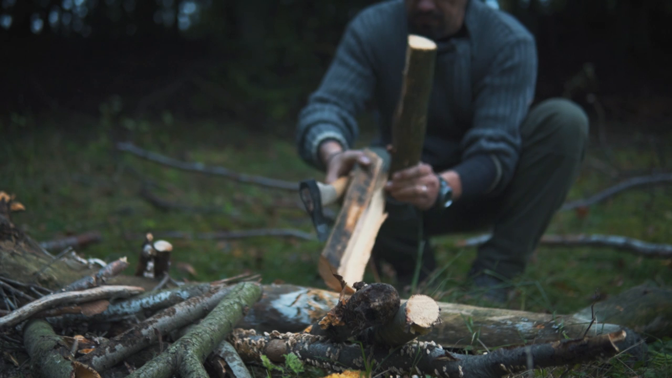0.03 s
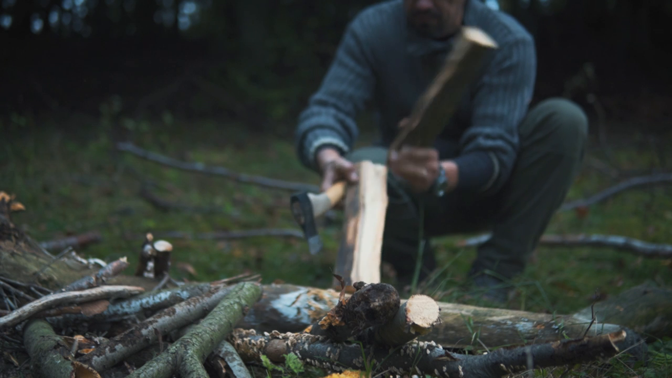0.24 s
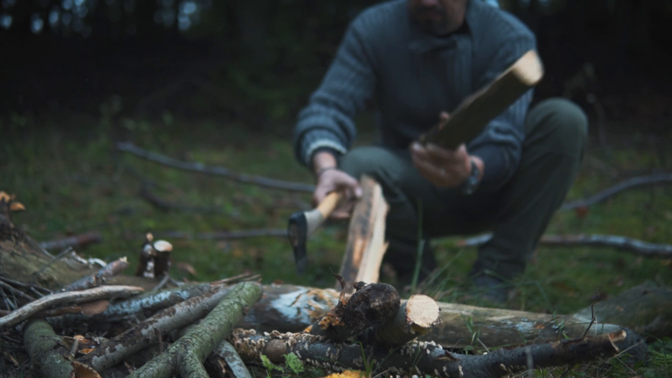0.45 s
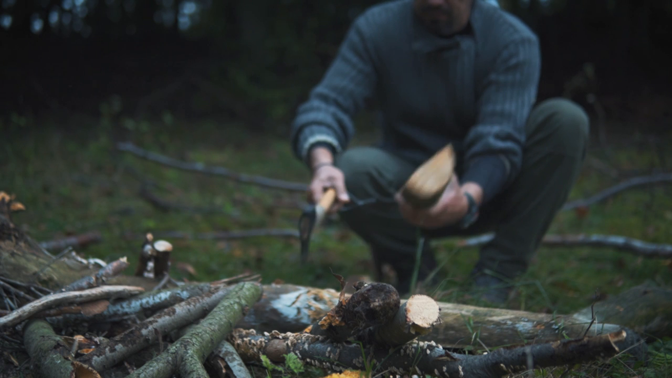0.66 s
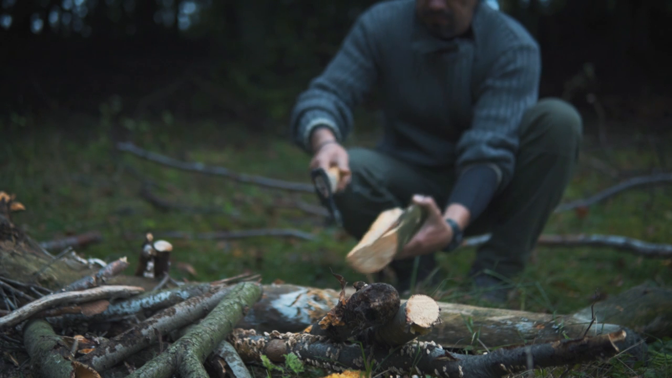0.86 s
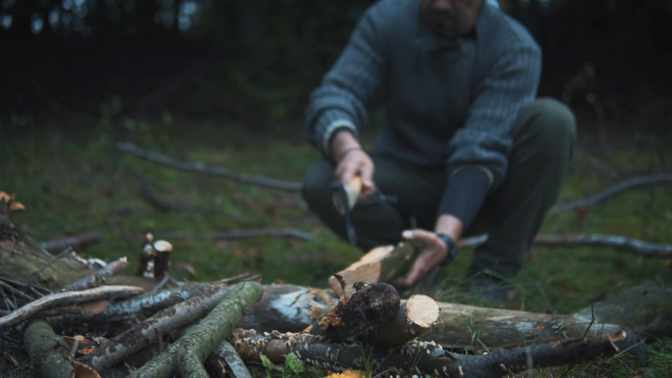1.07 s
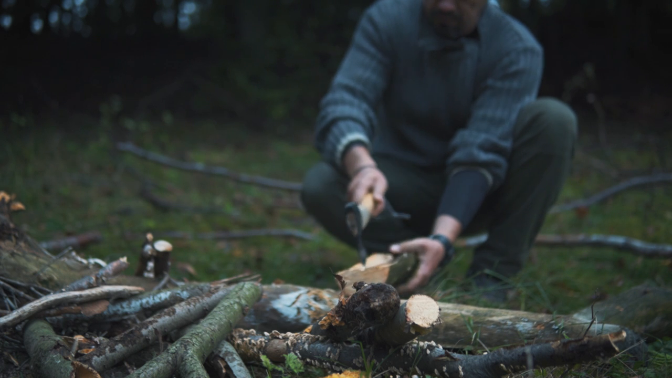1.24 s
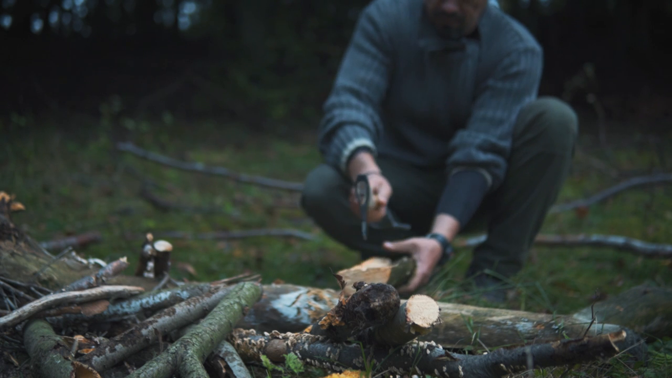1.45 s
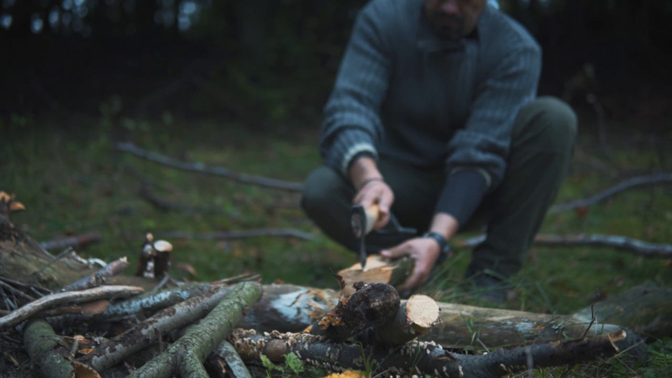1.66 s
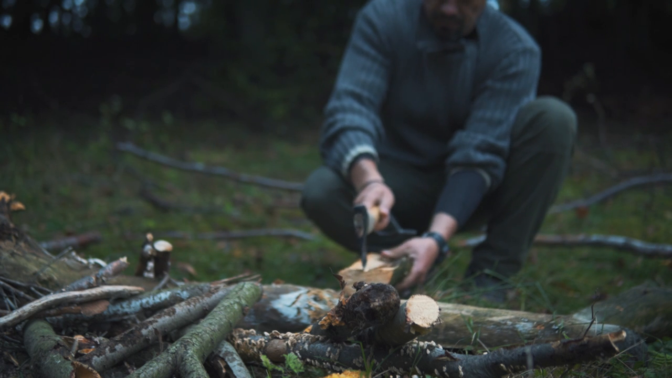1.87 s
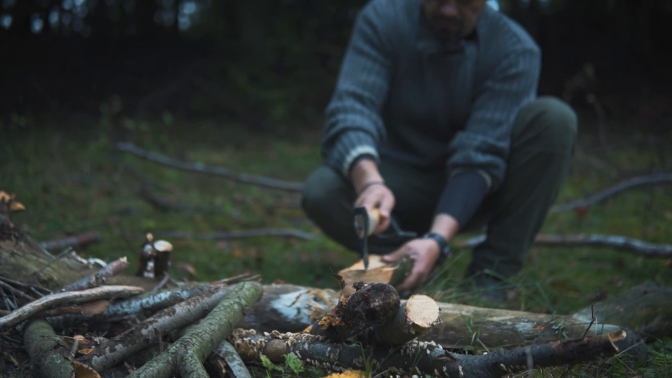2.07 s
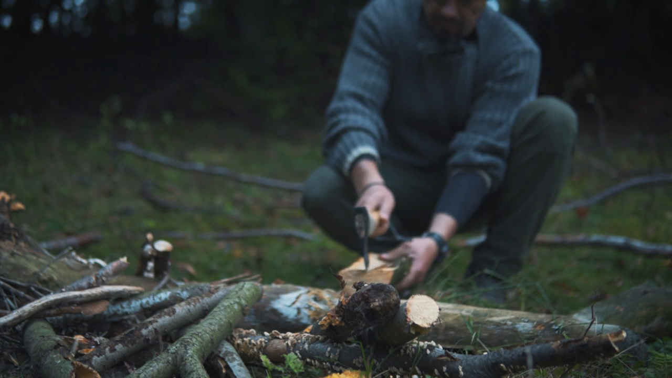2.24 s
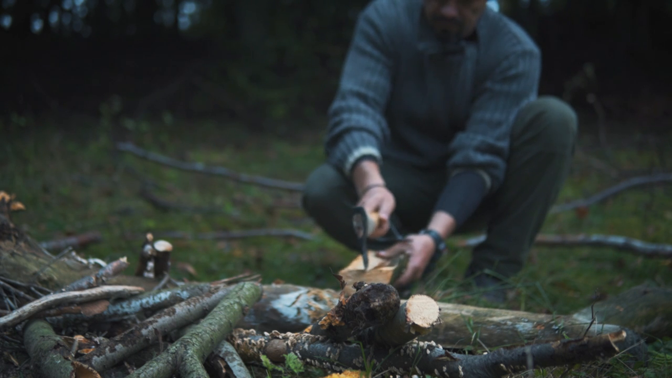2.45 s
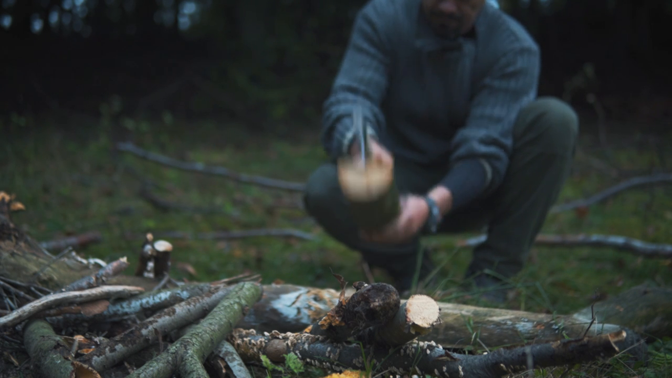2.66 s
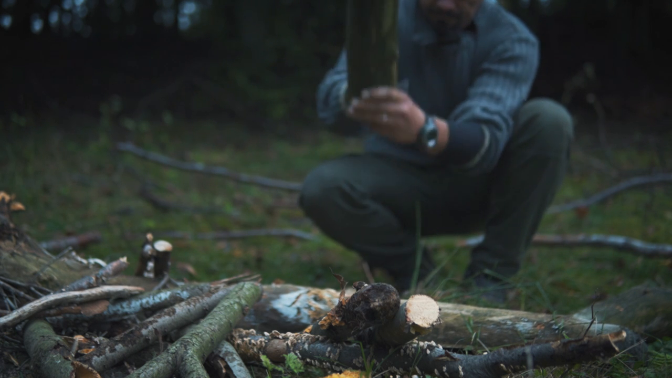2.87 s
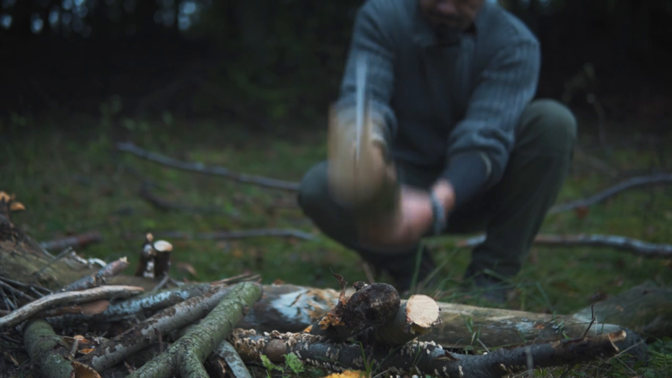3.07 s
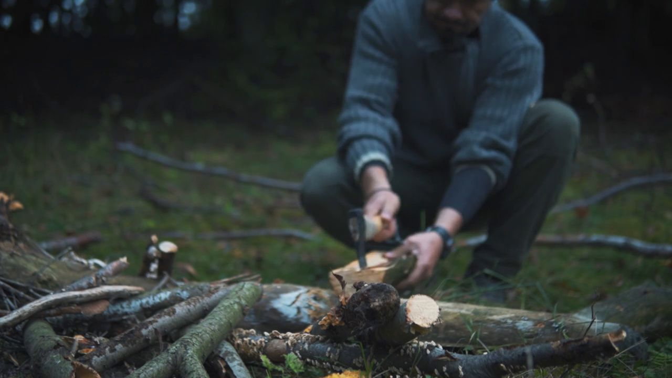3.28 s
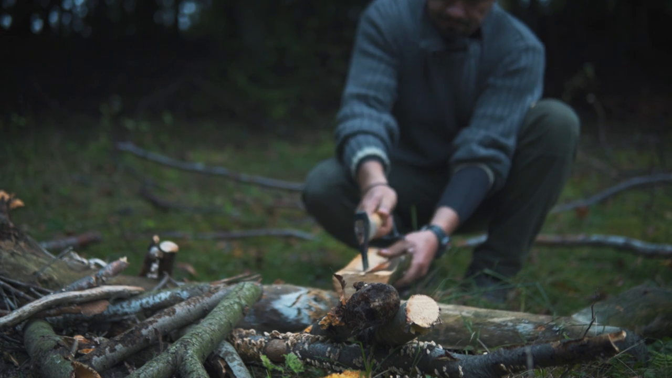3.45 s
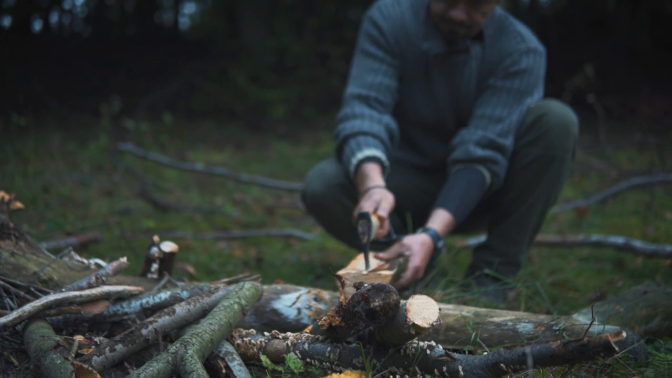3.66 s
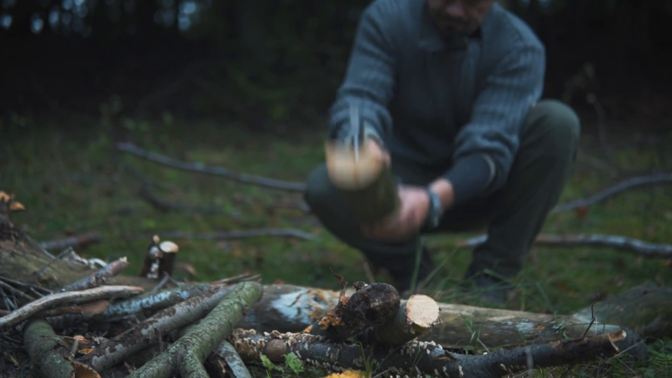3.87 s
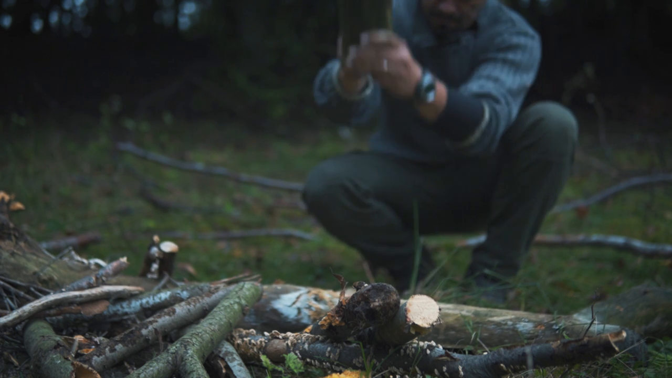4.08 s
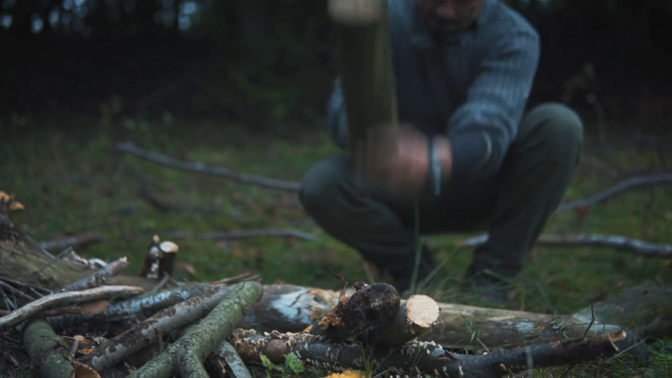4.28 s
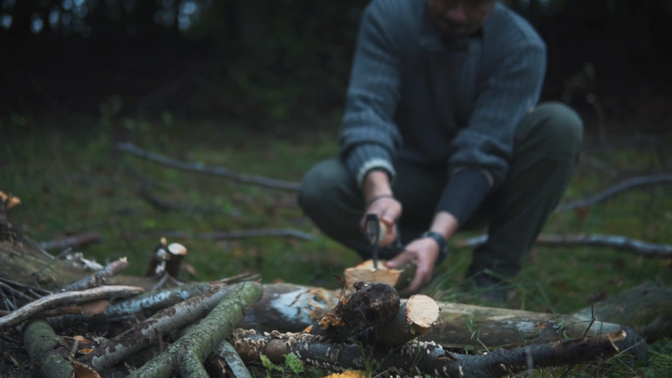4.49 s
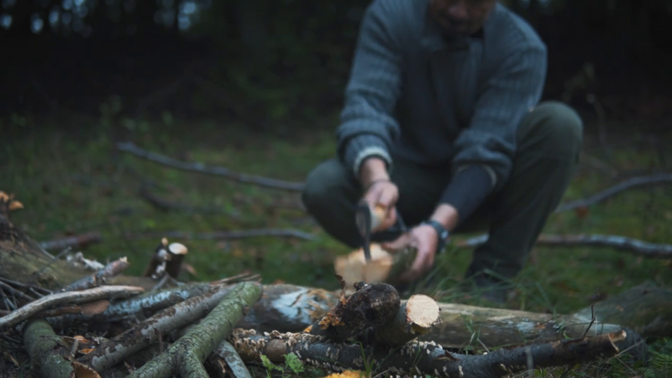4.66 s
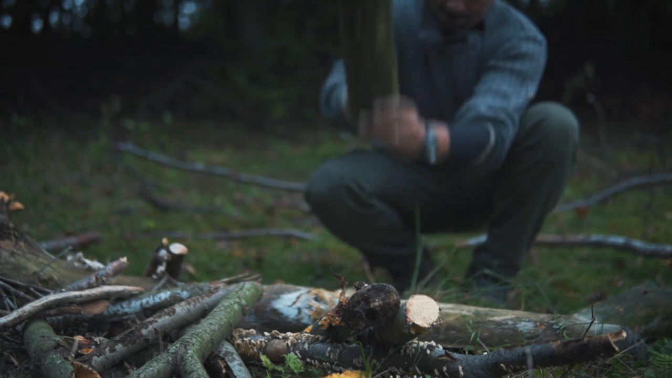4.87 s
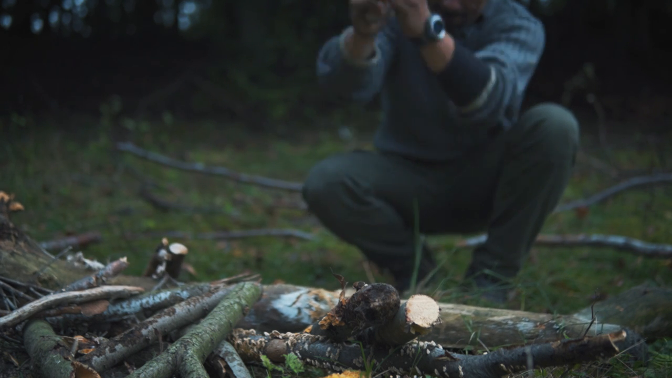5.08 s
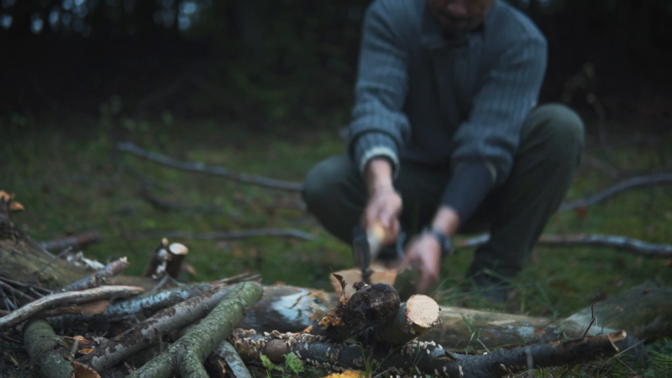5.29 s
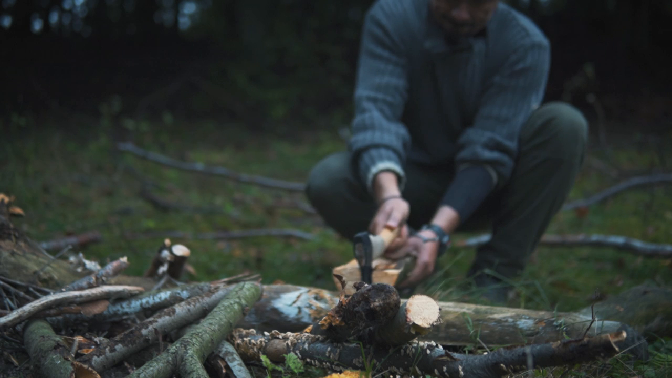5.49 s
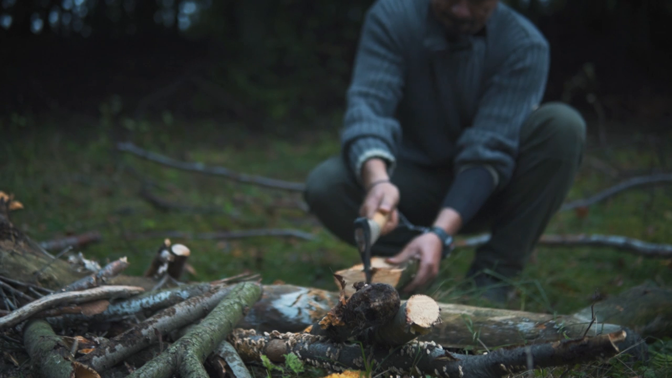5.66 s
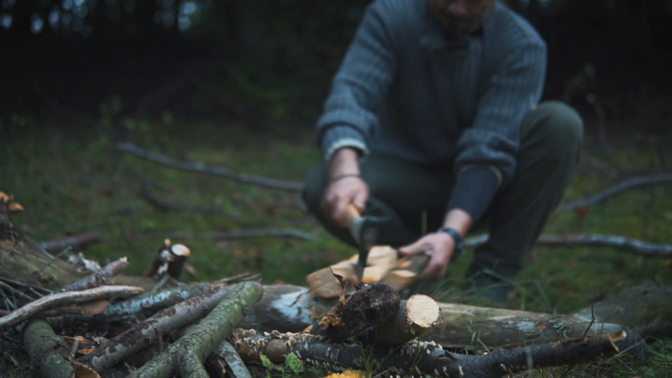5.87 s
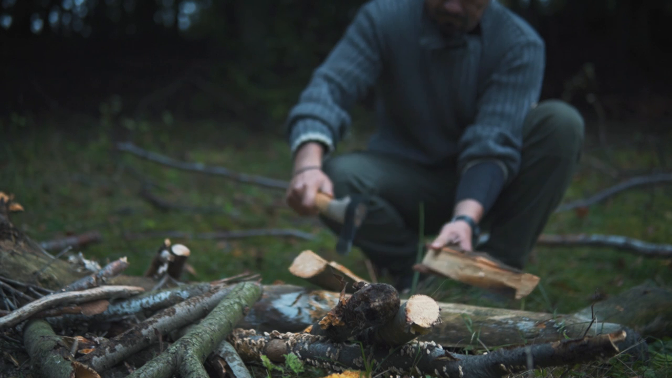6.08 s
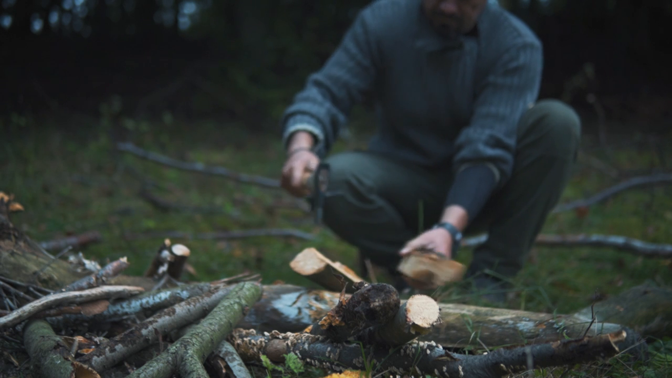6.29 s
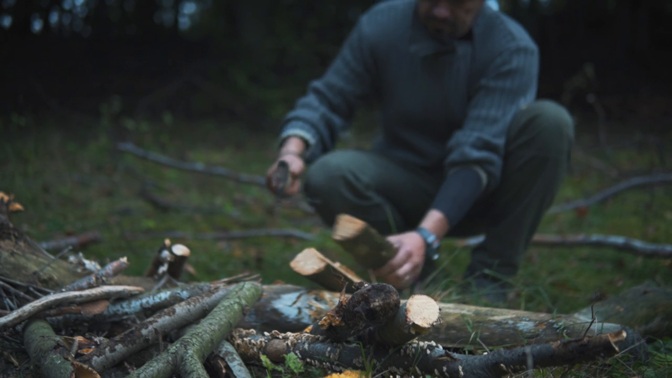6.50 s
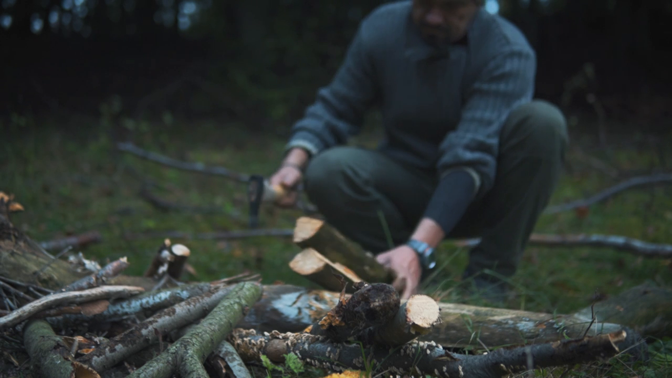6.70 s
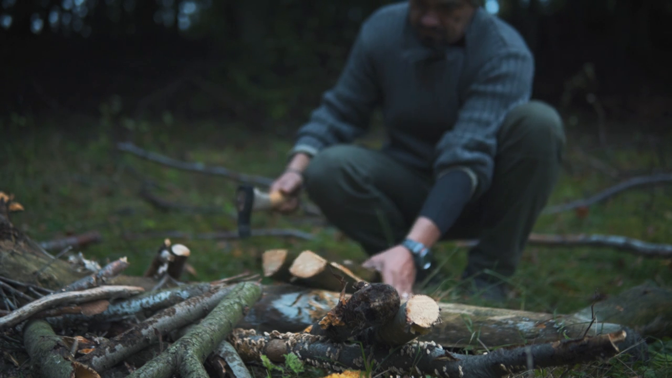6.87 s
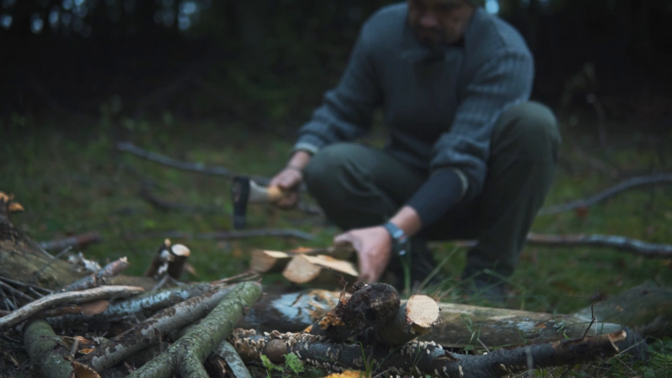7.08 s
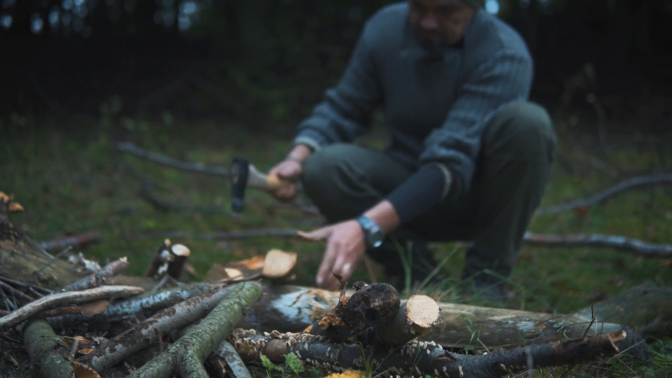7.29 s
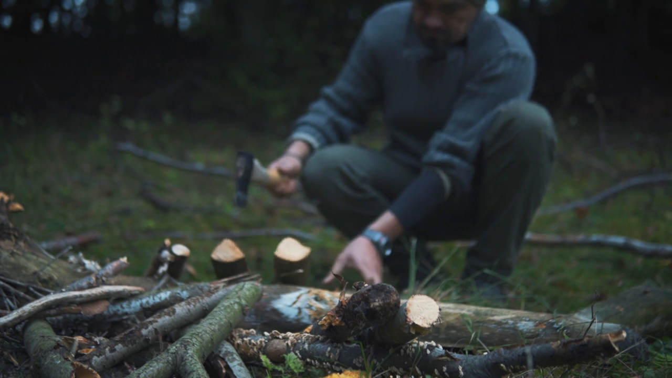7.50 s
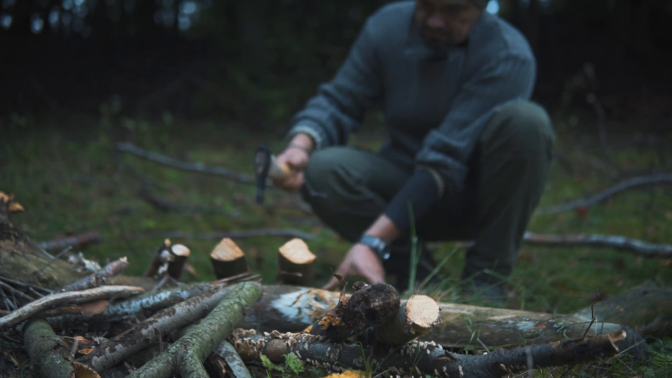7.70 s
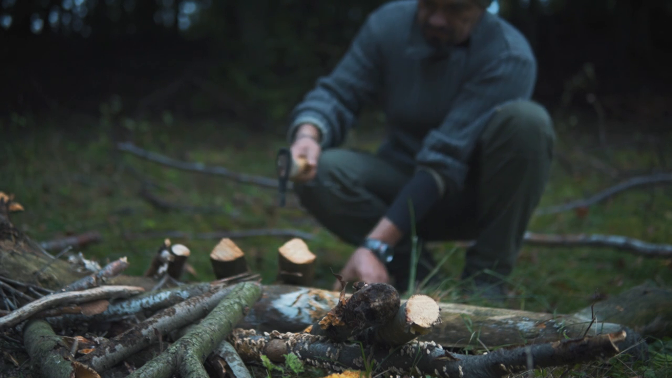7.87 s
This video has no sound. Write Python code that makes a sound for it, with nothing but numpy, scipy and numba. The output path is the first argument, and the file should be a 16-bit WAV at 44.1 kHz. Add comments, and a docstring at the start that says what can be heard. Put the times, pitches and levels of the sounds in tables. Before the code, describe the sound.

A bright splintering snap and hollow wooden clunks open the scene, followed by a quiet pause with one moderate knock. Three heavy chops on a billet hit hard, slightly squashed by the overloaded recorder, and the trees answer with a diffuse tail. Fibres then tear apart with a crisp crack, bark crackles and brushes softly, and the halves land with firm hollow knocks. Outdoors, a few metres away, over a faint drone and wind rumble.

```python
"""Splitting billets in a clearing

A hatchet is driven through short billets on a log in a forest clearing, a few metres from one microphone.
Wood knocks as decaying modes under a thud and a noise crack; tearing fibres and bark are bursts of clicks.
Swelling bands of grainy noise give soft swishes and, where narrow, faint unsteady rings near 2 kHz.
Tree trunks return a late, clumped echo and the ground booms; a far motor hums over rumble and hiss.
The recorder ducks its gain after each loud onset and limits hard.
"""
import sys
import numpy as np
from scipy import signal
from scipy.fft import rfft, irfft
from scipy.io import wavfile
from scipy.ndimage import uniform_filter1d
from numba import njit

SR = 44100
rng = np.random.default_rng(int(sys.argv[2]) if len(sys.argv) > 2 else 0)


def gain_from_decibels(decibels):
    """Convert decibel values to linear amplitude factors."""
    exponent = np.asarray(decibels, float) / 20
    return 10 ** exponent


def master_out(mix):
    """Clip the mix to full scale and print it as 16-bit PCM to the path in sys.argv[1]."""
    frames = np.transpose(np.atleast_2d(mix))
    ceiling = np.clip(frames, -1, 1)
    pcm = np.round(ceiling * 32767).astype(np.int16)
    wavfile.write(sys.argv[1], SR, pcm)


N = 350154
T = np.arange(N) / SR


def unit(x):
    """Normalization: scales a signal to an rms of 1."""
    return x / np.sqrt(np.mean(x ** 2))


def decay(t60, size):
    """Exponential damping: an envelope that falls 60 dB in t60 seconds."""
    return np.exp(-np.log(1000) * np.arange(size) / SR / t60)


def ring(hz, t60, size):
    """Damped free vibration: one mode as a decaying sine."""
    return np.sin(2 * np.pi * hz * np.arange(size) / SR) * decay(t60, size)


def band(x, hz, width_hz):
    """Band-pass filtering: edges lie width_hz apart with hz as their geometric mean, below 0.45 SR."""
    top = np.sqrt(hz ** 2 + width_hz ** 2 / 4) + width_hz / 2
    edges = [hz ** 2 / top, min(top, 0.45 * SR)]
    return signal.sosfilt(signal.butter(2, edges, "band", fs=SR, output="sos"), x)


def colour(size, points):
    """Spectral shaping: noise of rms 1 that follows (frequency [Hz], density [dB per Hz]) points."""
    hz, db = np.transpose(points)
    f = np.fft.rfftfreq(size, 1 / SR) + 1
    gain = gain_from_decibels(np.interp(np.log(f), np.log(hz), db, left=-99, right=-99))
    return unit(irfft(rfft(rng.standard_normal(size)) * gain, size))


def walk(rate, size=N):
    """Slow random modulation: about rate fresh values a second, smoothed, spread about 1."""
    hold = int(SR / rate)
    steps = np.repeat(rng.standard_normal(size // hold + 1), hold)
    return np.sqrt(1.5) * uniform_filter1d(steps, hold)[:size]


def add(out, s, x):
    """Superposition: mixes x into out from s seconds on."""
    i = max(int(s * SR), 0)
    out[i:i + len(x)] += x[:N - i]


# normal modes of each struck piece: piece -> (frequency [Hz], level [dB], t60 [s])
PIECE_MODES = { "log": [(203, 1.5, 0.19), (300, 1, 0.079), (430, -0.5, 0.072), (621.4, 2.5, 0.046),
               (836, -15, 0.068), (1000, -13, 0.095), (1500, -40, 0.029), (1503, -18, 0.074)],
               "billet": [(246, 0, 0.053), (330, -13, 0.14), (400, 1.5, 0.035), (471, 13.5, 0.027),
               (617, 6, 0.027), (712, 0, 0.047), (906, -7.5, 0.05), (1087, -4, 0.037), (1400, -26, 0.055)],
               "shard": [(1123, 5, 0.059), (1335, 3, 0.036), (1885, 6, 0.04), (2670, -4, 0.038)],
               "half": [(456, 10, 0.024), (600, -17, 0.15), (797, 3.5, 0.076), (1070, -1.5, 0.13),
               (1323, -1, 0.11), (2030, -17, 0.043), (2750, -31, .07)], "quarter": [(360.6, -12, 0.19),
               (663, -6, 0.12), (752, -0.5, 0.21), (840, -21, .07), (970, -8, 0.051), (1057, -4, 0.092),
               (1200, -12, 0.054), (1760, -31, 0.11)], "sliver": [(630, -14.5, 0.08), (904, -1, 0.1),
               (1060, -11.5, 0.13), (6430, -30, 0.29), (2600, -32, 0.15)], "hatchet": [(2170, 4.5, 0.059),
               (2690, -33, 0.013), (3280, 4, 0.022), (5000, -31, 0.036), (6740, -33.5, 0.23)], }
# blows: (time [s], piece, thud level [dB], thud frequency [Hz], ring level [dB], crack level [dB])
BLOWS = [ (0.2431, "shard", -32, 1160, -14.5, -5), (.382, "hatchet", -5, 201, -29.5, -24.5),
         (.384, "half", -30, 800, -33.5, -35), (.559, "log", -12, 196, -42, -60),
         (.622, "log", -7, 450, -28.5, -39), (.762, "half", 13.5, 330, -14, -21.5),
         (1.049, "log", 13.5, 330, -10.5, -23), (1.6662, "log", -1, 403, -23.5, -26.5),
         (1.669, "billet", -7.5, 870, -27, -32.5), (2.139, "log", -18, 275, -45, -48),
         (3.2027, "billet", 16.5, 430, 0, 6), (3.207, "billet", 18, 450, -8, -9),
         (4.341, "half", -31, 800, -40, -40), (4.37, "half", -14, 1210, -39.5, -34.5),
         (4.443, "billet", 16.5, 626, 1.5, 7.5), (5.367, "billet", 13.5, 555, 1, 7),
         (5.694, "log", -13, 520, -36.5, -38), (5.9171, "hatchet", -7, 2190, -17.5, -7.5),
         (5.935, "sliver", -19, 400, -26, -13.5), (6.066, "sliver", -15.5, 600, -29, -31.5),
         (6.084, "sliver", -3, 323, -13, -28), (6.689, "billet", -8, 290, -27, -28),
         (7.0, "hatchet", -23, 300, -48, -27), (7.278, "log", -20, 300, -36.5, -36),
         (7.341, "quarter", 14, 580, -2, -18), (7.385, "quarter", 6.5, 505, -24, -33.5),
         (7.465, "log", -15, 300, -34, -32), (7.476, "hatchet", -16, 1950, -34, -28)]
# spectrum of the crack: (frequency [Hz], density [dB per Hz])
CRACK_SPECTRUM = [(150, 3), (500, -2.5), (1200, 8.5), (2500, 5.5), (5000, -6), (9000, -14.5),
                  (15700, -17.5)]
CRACK_T60_S, BITE_S = 0.026, 0.002  # fibres give way over a moment
SPOT_DB, ROUGH_DB = 1.5, 1.8  # colour of each blow, random roughness of each mode's level
THUD_T60_S, THUD_SHORTENS = 0.016, 0.38  # t60 at 400 Hz; harder, higher contacts end sooner (power of pitch)
KNOCK_GROUND_DB = -43


def knocks(size=16384):
    """Modal impact: each blow is a contact thud, the piece's modes and a crack; log blows push the ground."""
    out, push = np.zeros(N), np.zeros(N)
    for s, piece, thud_db, thud_hz, ring_db, crack_db in BLOWS:
        modes = np.zeros(size)
        for hz, db, t60 in PIECE_MODES[piece]:
            level_shift, pitch_shift = rng.standard_normal(2)  # each blow lands elsewhere on the piece
            level = gain_from_decibels(db + SPOT_DB * level_shift + ROUGH_DB * walk(156, size=size))
            modes += level * ring(hz * (1 + 0.0094 * pitch_shift), t60, size)
        modes *= 1 - decay(0.0082, size)  # the ring builds while the contact lasts

        thud = ring(thud_hz, THUD_T60_S * (400 / thud_hz) ** THUD_SHORTENS, size)
        thud *= 1 - decay(3.5 / thud_hz, size)  # the push builds over the first cycle

        crack = colour(size, CRACK_SPECTRUM) * decay(CRACK_T60_S, size) * (1 - decay(BITE_S, size))
        add(out, s, gain_from_decibels(thud_db) * thud + gain_from_decibels(ring_db) * modes + gain_from_decibels(crack_db) * crack)
        if piece == "log":
            push[int(s * SR)] = gain_from_decibels(thud_db + KNOCK_GROUND_DB)
    return out, push


# fibres tearing and bark snapping: (time [s], nominal level [dB], centre frequency [Hz], time scale [s])
FIBRE_SNAPS = [ (.182, -39, 3970, 0.0056), (.191, -31, 3360, 0.0049), (.208, -38.5, 2900, 0.014),
               (.2295, -27, 2760, 0.0044), (.235, -21, 3950, .006), (.2422, -12.5, 9100, .003),
               (.2475, -16.5, 5700, 0.0059), (2.137, -43, 5200, .0089), (3.161, -39, 4270, 0.0037),
               (4.233, -46, 3480, 0.00235), (5.696, -27.5, 2900, 0.0064), (5.907, -42, 9400, 0.0058),
               (5.9152, -14, 9100, 0.0017), (5.917, -9, 8300, 0.0027), (5.9198, -8.5, 5000, 0.0047),
               (5.9357, -10.5, 8850, .0012), (5.952, -34, 4000, 0.01), (6.109, -44, 1990, 0.021),
               (6.167, -44.5, 3520, 0.017), (6.2495, -37.5, 1500, 0.0048), (6.289, -37.5, 1560, .0043),
               (6.346, -42, 1500, .0054), (6.64, -42, 10000, 0.0127), (6.67, -37.5, 5000, 0.0084),
               (6.674, -44, 10100, 0.0072), (6.697, -37, 8900, 0.017), (6.712, -38, 10000, 0.0062),
               (6.754, -35, 2500, 0.0064), (6.756, -36.5, 8500, 0.0035), (6.861, -39, 8000, 0.01),
               (7.273, -46, 5860, 0.013), (7.431, -45.5, 6400, 0.0059), (7.547, -53, 5065, .0022)]
# loose bark crackling while pieces are handled: (from [s], to [s], rate [clicks per s], base level [dB])
BARK_CRACKLE = [(0.054, .24, 40, -50), (5.921, 5.998, 250, -49.5), (6.618, 7.017, 90, -51),
                (7.402, 7.56, 51, -49)]
SNAP_WIDTH, SNAP_WIDEST_HZ = 0.61, 4060  # band width over centre, up to a limit


def snaps():
    """Impulsive fracture noise: bursts of tiny clicks rise quickly and die; handling scatters more."""
    out, rows = np.zeros(N), list(FIBRE_SNAPS)
    for start, end, rate, db in BARK_CRACKLE:
        when, size, pitch, length = rng.random((int(rate * (end - start)), 4)).T
        times = start + (end - start) * when
        levels = db - 2.5 * np.log(size)  # many faint clicks, a few loud ones
        rows += zip(times, levels, 2500 * 2 ** (1.8 * pitch), 0.00063 + 0.012 * length)
    for s, db, hz, length in rows:
        size = int(3 * length * SR)
        clicks = rng.standard_normal(size) * gain_from_decibels(3.1 * rng.exponential(size=size))
        burst = unit(band(clicks, hz, min(SNAP_WIDTH * hz, SNAP_WIDEST_HZ)))
        envelope = 2 * decay(4 * length, size) * (1 - decay(length / 2, size))
        add(out, s, gain_from_decibels(db) * burst * envelope)
    return out


def grainy_swells(rows, width):
    """Band-limited noise: grains in a band swell and fade unevenly; width is band width over centre."""
    out = np.zeros(N)
    for s, db, hz, length in rows:
        size = int(length * SR)
        grain = rng.standard_normal(size) * gain_from_decibels(2 * rng.exponential(size=size))
        swell = unit(band(grain, hz, width * hz)) * np.hanning(size)
        add(out, s - length / 2, gain_from_decibels(db) * swell * gain_from_decibels(2.5 * walk(59.0, size=size)))
    return out


# sleeves and bark brushing past: (middle [s], level before the swell [dB], centre [Hz], length [s])
BRUSHES = [(.295, -54, 4930, 0.11), (.689, -44.5, 4160, .15), (.31, -45, 1000, 0.082),
           (.7, -39.5, 1200, 0.16), (.809, -39, 1200, 0.049), (2.92, -43.5, 1460, .28),
           (3.92, -53, 3000, 0.12), (4.064, -52.5, 2100, .17), (5.034, -53.5, 2070, 0.5),
           (5.355, -38, 1500, 0.041), (5.75, -49, 4000, .42), (5.96, -37, 4700, 0.077),
           (6.095, -42.5, 8000, .048), (6.705, -35, 1000, .06), (6.732, -48.5, 2960, 0.18),
           (6.85, -49, 1400, 0.33), (6.812, -53, 3300, .094), (6.925, -53.5, 5000, 0.21),
           (7.447, -53, 3920, 0.16), (7.797, -55, 2900, 0.27)]


def swishes():
    """Broadband noise: wide bands of grain give a soft, unpitched swish."""
    return grainy_swells(BRUSHES, 1.31)


# faint, unsteady rings near 2 kHz, perhaps the hatchet head:
# (middle [s], level before the swell [dB], pitch [Hz], length [s])
HATCHET_RINGS = [(.307, -34.5, 1920, 0.063), (.439, -48.5, 2140, 0.051), (.521, -45.5, 2230, 0.097),
                 (.598, -47.5, 1960, 0.079), (.812, -45, 2090, 0.063), (6.684, -47, 2170, 0.19),
                 (6.868, -42, 1850, .02), (6.972, -41, 3100, 0.013), (7.434, -50, 2170, 0.12)]


def faint_rings():
    """Narrow-band noise: a narrow band of grain is heard as an unsteady pitch."""
    return grainy_swells(HATCHET_RINGS, 0.062)


# echo of the trunks: (frequency [Hz], level [dB], early t60 [s], late share [dB], late t60 [s])
TRUNK_ECHO = [(126, -13, 0.27, -15, 0.65), (189, -8.5, 0.12, -19, .8), (293, -2, 0.21, -29.5, 1.07),
              (450, -3, 0.21, -21.5, 1.05), (707, -5.5, 0.28, -13.5, 1.38), (1000, -9.5, 0.33, -16.5, 1.93),
              (1400, -10, .4, -15, 1.61), (2100, -21, 0.17, -5, 0.94), (2900, -18, 0.18, -4, 0.77),
              (3960, -19, 0.24, -9, 0.78), (6000, -25, 0.26, -10, 0.64), (8000, -28, 0.17, -13, 0.65),
              (12600, -50, 0.16, -23, .4)]
CLEARING_S = 0.02  # silence while sound crosses the clearing


def trees(bright_db, swell_s, lumpy_db=1.3, size=70000):
    """Multiple scattering: delayed trunk echoes swell, then die by band; bright_db tilts them per octave."""
    t = np.arange(size) / (SR * swell_s)
    swell = t ** 2.3 / (1 + t ** 2.3)
    after = np.maximum(np.arange(size) - int(swell_s * SR), 0)  # the dying starts after swell_s
    clumps = gain_from_decibels(lumpy_db * walk(159.2, size=size))  # trunks stand in groups
    echo = np.zeros(size)
    for hz, db, early_t60, late_db, late_t60 in TRUNK_ECHO:
        noise = band(rng.standard_normal(size), hz, 0.64 * hz)
        noise = unit(band(noise, hz, 0.64 * hz))  # a second pass steepens the band
        level = gain_from_decibels(db + bright_db * np.log2(hz / 1000) + lumpy_db * walk(111.3, size=size))
        fall = decay(early_t60, size) + gain_from_decibels(late_db) * decay(late_t60, size)
        echo += level * noise * fall[after]
    return np.r_[np.zeros(int(CLEARING_S * SR)), echo * clumps * swell]


def handling_echo(near):
    """Reverberation by convolution: knocks and snaps, held to full scale, return faintly from the trunks."""
    return gain_from_decibels(-64) * signal.fftconvolve(np.clip(near, -1, 1), trees(9.6, 0.022))[:N]


# full swings that the whole clearing answers:
# (time [s], echo level [dB], brightness [dB per octave], swell [s], ground push [dB])
FULL_SWINGS = [(3.204, -12, -1.5, 0.044, -15), (4.444, -8.5, -0.5, 0.032, -10.5),
               (5.365, -6, 2, 0.038, -10)]


def swing_echoes():
    """Impulse response: each full swing excites the clearing's echo and pushes the ground once."""
    echo, push = np.zeros(N), np.zeros(N)
    for s, echo_db, bright_db, swell_s, ground_db in FULL_SWINGS:
        add(echo, s, gain_from_decibels(echo_db) * trees(bright_db, swell_s))
        push[int(s * SR)] += gain_from_decibels(ground_db)
    return echo, push


# resonances of the soil: (frequency [Hz], level [dB], t60 [s])
SOIL_MODES = [(37.7, -4, 1), (48.8, 3, 0.3)]
GROUND_LAG_S = 0.0326


def ground(push, size=40000):
    """Slow ground wave: the soil carries each push as a late boom of modes that start opposed and beat."""
    boom = np.zeros(size)
    for k, (hz, db, t60) in enumerate(SOIL_MODES):
        boom += (-1) ** k * gain_from_decibels(db) * ring(hz, t60, size)
    return signal.fftconvolve(push, np.r_[np.zeros(int(GROUND_LAG_S * SR)), boom])[:N]


# mean course of the far motor: (time [s], rms level [dB], octave rms level [dB])
MOTOR_LEVELS = [(0.0, -54, -45.5), (0.44, -39.5, -59), (0.95, -42, -50.5), (1.17, -38.5, -43),
                (1.68, -29.5, -53.5), (2.12, -38, -46), (2.54, -36.5, -57), (3.45, -50, -40.5),
                (3.69, -53.5, -55.5), (4.2, -47.5, -52.5), (4.64, -34, -54), (5.42, -38.5, -52.5),
                (5.9, -40, -43.5), (6.17, -34, -48.5), (7.28, -34.5, -48), (7.94, -25.5, -69)]
HUM_HZ = 115.1


def motor():
    """Harmonic tone in moving air: a far drone and its octave waver with the air between."""
    s, db, octave_db = np.transpose(MOTOR_LEVELS)
    phase = 2 * np.pi * np.cumsum(HUM_HZ + 0.894 * walk(8.9)) / SR
    low = gain_from_decibels(np.interp(T, s, db) + 2.6 * walk(8.6)) * np.sin(phase)
    high = gain_from_decibels(np.interp(T, s, octave_db) + 3.43 * walk(3.9)) * np.sin(2 * phase)
    return np.sqrt(2) * (low + high)  # peak of a sine over its rms


# mean course of wind and far rumble: (time [s], level [dB])
RUMBLE_LEVELS = [(0.0, -39), (0.66, -38.5), (2.63, -44.5), (3.32, -41), (3.65, -41), (4.71, -38),
                 (5.04, -40), (5.31, -36), (7.34, -33.5), (7.94, -36.5)]
# spectrum of the hiss: (frequency [Hz], density [dB per Hz])
AIR_SPECTRUM = [(100, 0), (160, 3.5), (310, -2.5), (500, -6), (1000, -9), (2000, -13.5), (4000, -17.5),
                (8000, -21.5), (15700, -24.5)]
AIR_DB, DEEP_DB = -46.5, -43  # mean levels; the deepest rumble wanders on its own


def air():
    """Stationary shaped noise: hiss of leaves and electronics over two wandering bands of rumble."""
    rumble_db = np.interp(T, *np.transpose(RUMBLE_LEVELS))
    deep = gain_from_decibels(DEEP_DB + 2.5 * walk(2.2)) * unit(band(rng.standard_normal(N), 33.0, 31.0))
    rumble = gain_from_decibels(rumble_db + 1.86 * walk(3.054)) * unit(band(rng.standard_normal(N), 68.6, 43.3))
    hiss = gain_from_decibels(AIR_DB + 0.33 * walk(2.39)) * colour(N, AIR_SPECTRUM)
    return hiss + deep + rumble


def scene():
    """Superposition: near wood and its echoes over the far sounds."""
    blows, log_push = knocks()
    near = blows + snaps()
    echo, swing_push = swing_echoes()
    echo += handling_echo(near)
    boom = ground(log_push + swing_push)
    return (near + swishes() + faint_rings() + echo + boom + motor() + air())[None]


@njit
def duck(x, top, attack, release, recover):
    """Feedforward compression: gain follows the peaks above top, a little too late for the first cycles."""
    y, envelope, gain = np.empty(len(x)), 0., 1.
    for i in range(len(x)):
        envelope = max(abs(x[i]), envelope * release)
        want = min(1., top / (envelope + 1e-9))
        gain += (want - gain) * (attack if want < gain else recover)
        y[i] = gain * x[i]
    return y


def band_limit(x):
    """A steep low-pass at the top of the band."""
    return signal.sosfilt(signal.butter(12, 17090, fs=SR, output="sos"), x)


DUCK_DB = -6  # peak level above which the gain falls
ATTACK_S, RELEASE_S, RECOVER_S = 0.0015, 0.0072, 0.0021  # time constants: gain fall, peak memory, gain rise


def record(dry):
    """Dynamic range limiting: gain control, then hard limiting at full scale."""
    attack, recover = 1 / (ATTACK_S * SR), 1 / (RECOVER_S * SR)
    release = np.exp(-1 / (RELEASE_S * SR))
    ducked = duck(dry[0], float(gain_from_decibels(DUCK_DB)), attack, release, recover)
    mix = np.clip(ducked, -1, 1)[None]
    return band_limit(mix)


dry = scene()
out = record(dry)
master_out(out)
```